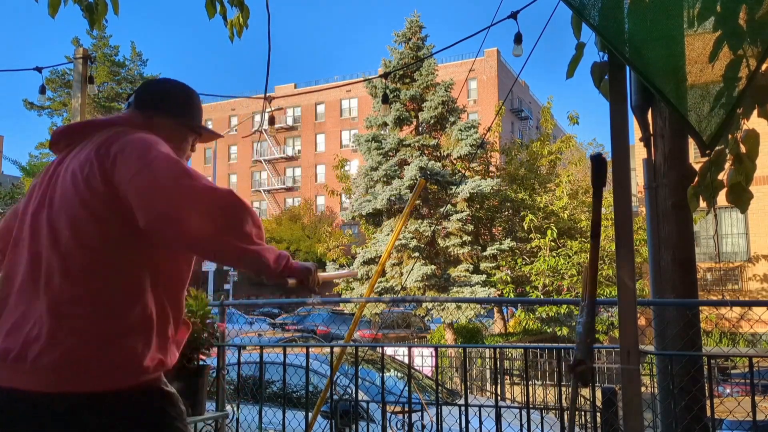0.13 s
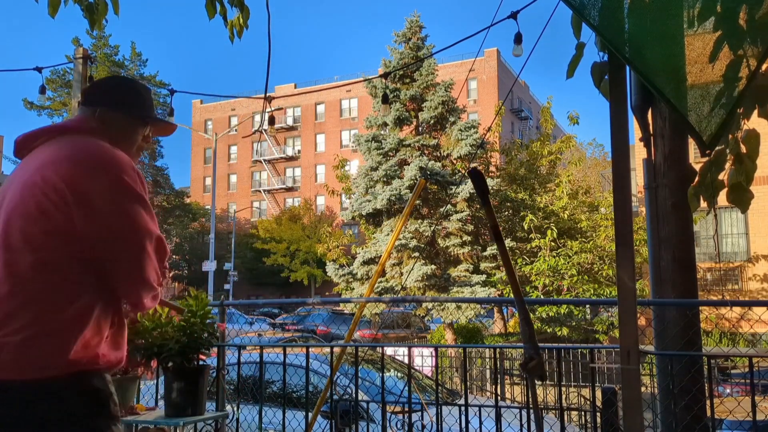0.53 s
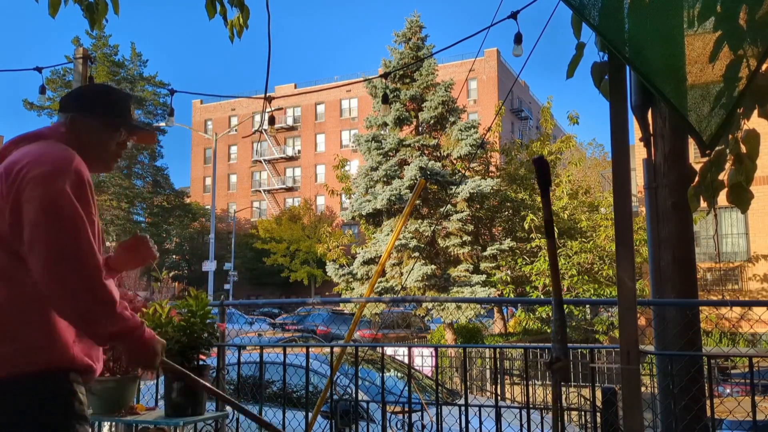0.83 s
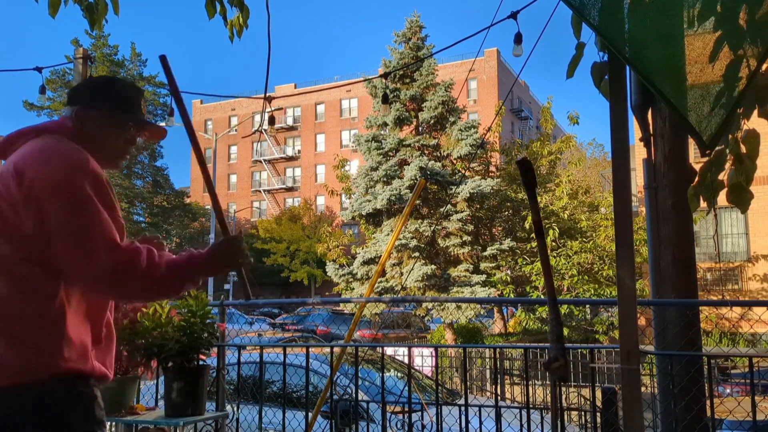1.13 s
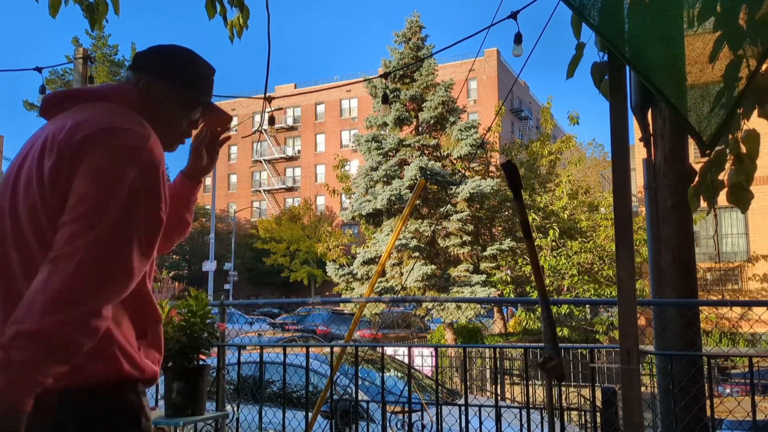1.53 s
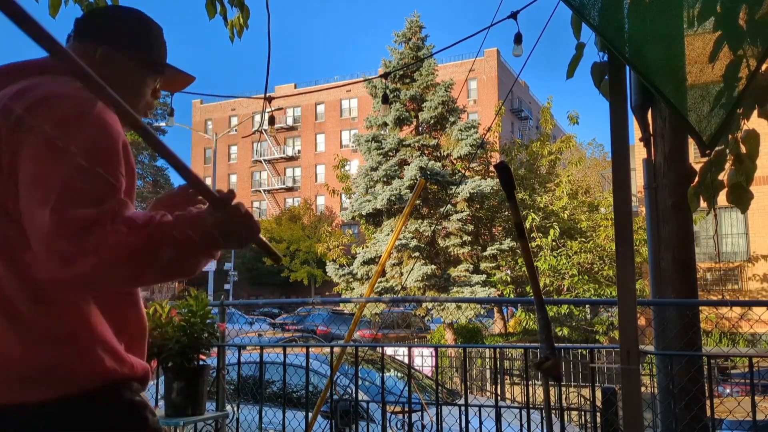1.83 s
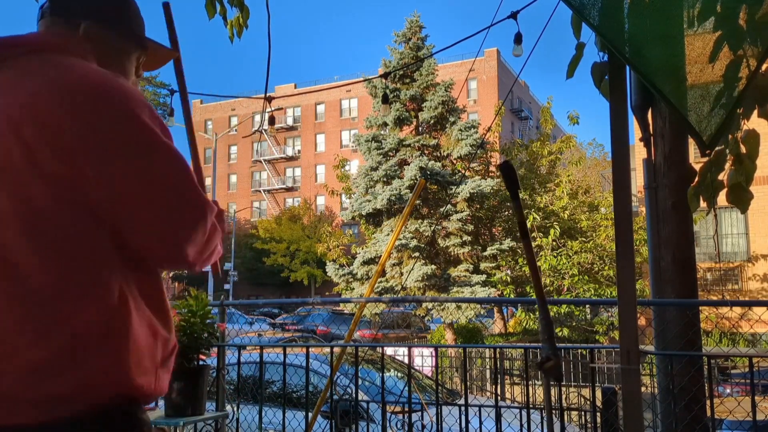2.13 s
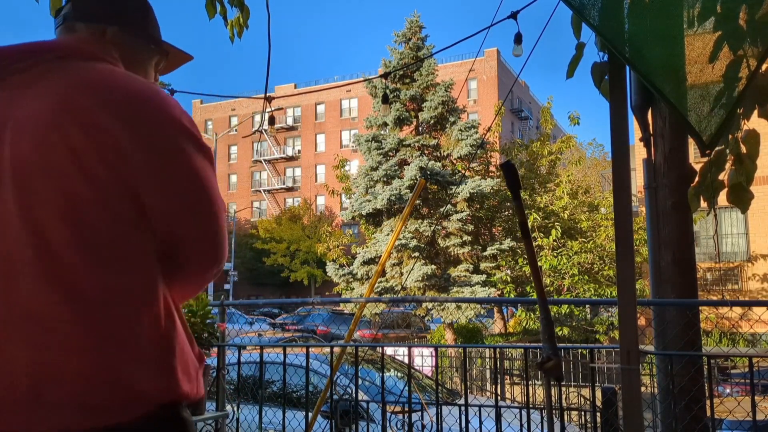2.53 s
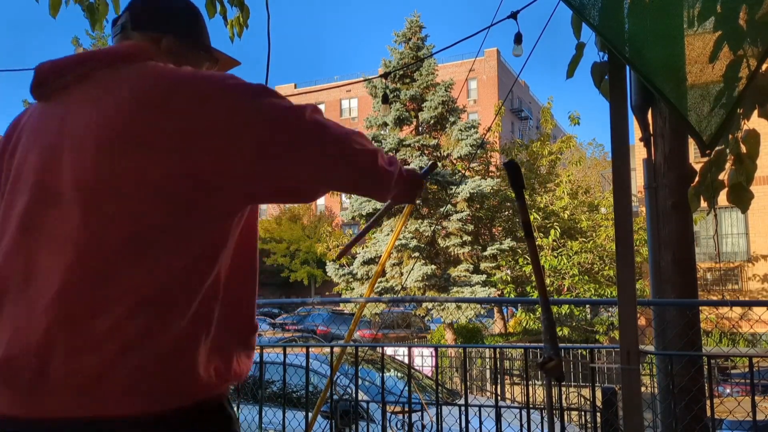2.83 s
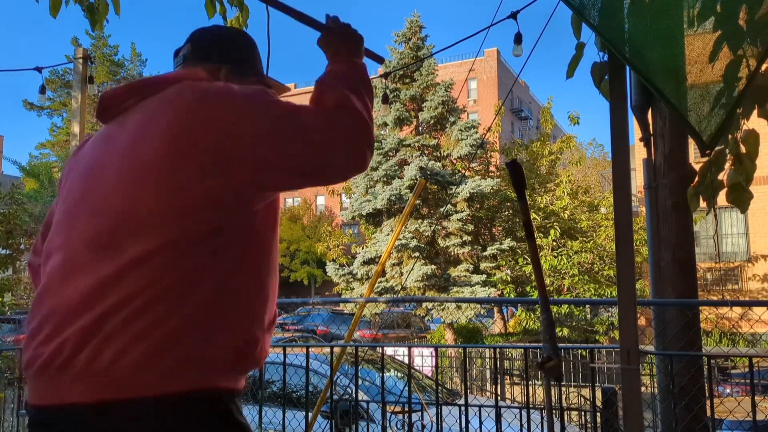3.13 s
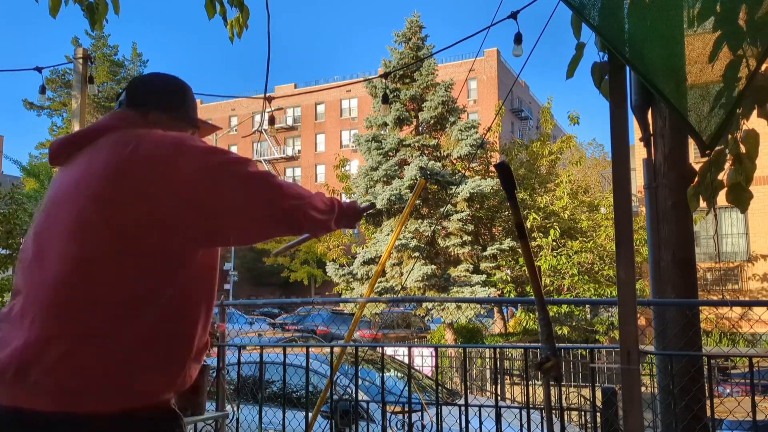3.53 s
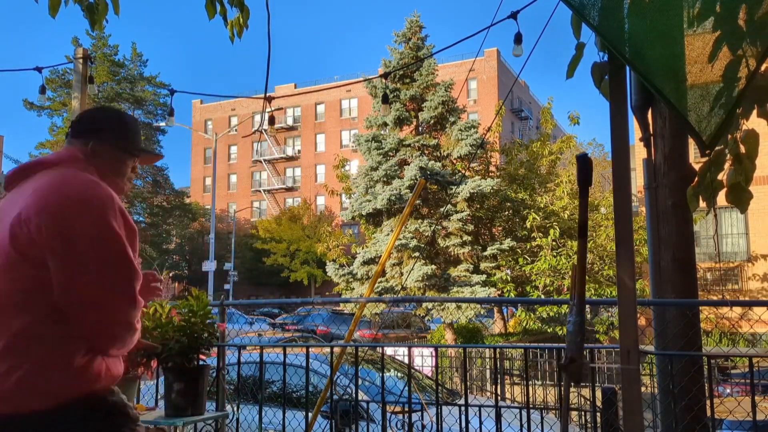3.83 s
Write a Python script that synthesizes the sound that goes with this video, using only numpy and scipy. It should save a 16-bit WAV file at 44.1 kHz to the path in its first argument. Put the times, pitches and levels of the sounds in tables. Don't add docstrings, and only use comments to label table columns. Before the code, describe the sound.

Sharp stick cracks on a hanging wooden baton outdoors, one first, two more after a long gap

```python
import sys
import numpy as np
from scipy import signal
from scipy.io import wavfile

SR = 44100
rng = np.random.default_rng(int(sys.argv[2]) if len(sys.argv) > 2 else 0)


def wav_out(sig):
    wavfile.write(sys.argv[1], SR, np.round(np.clip(np.atleast_2d(sig).T, -1, 1) * 32767).astype(np.int16))


def invert_db(level):
    return 10 ** (np.asarray(level, dtype=float) / 20)


N = 176400


def rms_one(x):
    return x / np.sqrt(np.mean(x ** 2) + 1e-20)


def band(x, lo_hz, hi_hz):
    return signal.sosfilt(signal.butter(2, [lo_hz, hi_hz], "band", fs=SR, output="sos"), x)


def at_hz(points, hz, axis=1):
    points = np.array(points)
    return np.interp(np.log(hz), np.log(points[:, 0]), points[:, axis])


def drift(rate_hz):
    r = np.exp(-80 * np.pi * rate_hz / SR)
    slow = signal.lfilter([1], [1, -2 * r, r * r], rng.standard_normal(N // 40 + 2002))[2000:]
    return np.interp(np.arange(N) / 40, np.arange(len(slow)), rms_one(slow))


def resonate(x, hz, width_hz):
    r = np.exp(-np.pi * width_hz / SR)
    zeros = np.array([1, 0, -1]) * (1 - r * r) / 2
    poles = [1, -2 * r * np.cos(2 * np.pi * hz / SR), r * r]
    return signal.lfilter(zeros, poles, x + 1e-18)


def ring(x, hz, width_hz, count):
    for _ in range(count):
        x = resonate(x, hz, width_hz)
    return x / abs(x).max()


def swell(start_s, length_s, rise_s, fall_s):
    t = np.arange(N) / SR - start_s
    return np.clip(t / rise_s, 0, 1) * np.exp(-np.clip(t - length_s, 0, 1) / fall_s)


def grains():
    spread_db, rate_hz = 3.2, 2000
    size_db = spread_db * np.minimum(rng.exponential(1, (2, N)), 5)
    size = invert_db(size_db) * rng.standard_normal((2, N))
    return size * (rng.random((2, N)) < rate_hz / SR)


# start in seconds, peak in dB, ring of the wood in Hz,
# centre of the colour sent to the walls in Hz, dull body in dB.
BLOWS = [
    (0.0612, -0.5, 1770, 2330, -29),
    (3.2794, -5, 2400, 2400, -18),
    (3.638, -3.5, 2430, 2870, -24.5),
]
# left over right in dB, cheek in dB, tick in dB, share to the walls in dB.
FACING = [(3.5, 3, 6, -3.5), (5.5, 6, 1, -1), (8, 1.8, 2.5, -1.5)]
# delay in seconds, left in dB, right in dB.
ECHOES = [(.083, -15, -19), (.098, -13, -20), (0.1281, -13, -22.5), (0.142, -26, -30), (0.161, -20, -23),
          (.178, -22, -25), (.191, -32, -32)]


def stick():
    bounce_s, bounce_db = 0.0021, -4.5
    out = np.zeros((2, N + 2 * SR))
    click = np.zeros(SR // 20)
    click[0] = 1
    body = ring(click, 508, 230, count=3)
    cheek = invert_db(-18) * ring(click, 1013, 870, count=2)
    tick = invert_db(-16) * np.roll(ring(click, 2 * 3870, 6500, count=2), int(0.0006 * SR))
    for blow, facing in zip(BLOWS, FACING):
        start_s, peak_db, wood_hz, walls_hz, body_db = blow
        pan_db, cheek_db, tick_db, walls_db = facing
        paths = np.zeros((2, SR))
        paths[:, 0] = invert_db([pan_db / 2, -pan_db / 2])
        paths[:, int(bounce_s * SR)] = invert_db(bounce_db)
        for delay_s, *sides_db in ECHOES:
            paths[:, int(delay_s * SR)] = invert_db(np.add(sides_db, walls_db))
        edge = invert_db(tick_db) * tick + invert_db(cheek_db) * cheek
        direct = ring(click, wood_hz, 1470, count=4) + edge + invert_db(body_db + 1.5) * body

        lo_hz, hi_hz = 0.69 * walls_hz, 1.276 * walls_hz
        flat = band(band(click, 0.82 * lo_hz, 1.5 * hi_hz), lo_hz, hi_hz)
        to_walls = invert_db(0.5 + walls_db) * flat / abs(flat).max() + invert_db(-4) * edge + invert_db(body_db) * body

        hit = signal.fftconvolve(direct[None], paths, axes=1)
        hit = hit + signal.fftconvolve(to_walls[None], yard_tail(), axes=1)
        first = int(start_s * SR)
        out[:, first:first + hit.shape[1]] += invert_db(peak_db) * hit
    return out[:, :N]


# frequency in Hz, first T60 in seconds, late T60 in seconds, late part in dB.
YARD = [(414.6, 0.22, 1, -15.5), (1440, 0.14, 1, -11), (2450, 0.12, 0.74, -8.5), (4440, 0.12, 0.73, -10),
        (8250, 0.15, 0.71, -4.5), (13820, 0.1, 0.34, -16)]


def yard_tail():
    level_db, lumps_db, low_alike = -24, 1.5, 0.32
    start_s, rise_s, hold_s, early = 0.008, 0.004, 0.028, invert_db(-8)
    facade_s, facade_spread_s, facade_db = 0.11, 0.029, 6
    t = np.arange(SR) / SR
    late_s = np.maximum(t - hold_s, 0)
    lumps = rng.standard_normal((2, SR // 50)).repeat(50, axis=1)
    white = rng.standard_normal((2, SR)) * invert_db(lumps_db * lumps)
    edges_hz = np.geomspace(200, 17000, num=9)
    tail = 0
    for lo, hi in zip(edges_hz, edges_hz[1:]):
        first_t60, late_t60, late_db = (at_hz(YARD, np.sqrt(lo * hi), axis=k) for k in (1, 2, 3))
        source = white + (hi < 1100) * low_alike * white[::-1]
        decay = invert_db(-60 * late_s / first_t60) + invert_db(late_db - 60 * late_s / late_t60)
        tail = tail + band(np.roll(source, int(lo), axis=1), lo, hi) * decay
    tail = tail * invert_db(facade_db * np.exp(-((t - facade_s) / facade_spread_s) ** 2))
    build = early + (1 - early) * np.clip((t - start_s) / rise_s, 0, 1)
    return invert_db(level_db) * tail * (t > 0.003) * build


# start in seconds, level in dB, die-away in seconds,
# low part in Hz, low part in dB.
KNOCKS = [
    (2.957, -32.5, 0.021, 520, 2.5),
    (3.048, -53, 0.027, 2150, 8),
    (3.083, -29.5, 0.0099, 2030, -14),
    (3.788, -60.5, 0.045, 575, 25.5),
    (3.9604, -48.5, 0.0058, 282, 13.5),
    (3.969, -61.5, 0.014, 290, 25),
    (3.988, -44.5, .015, 1130, 5.5),
]


def knocks():
    rattle = rms_one(grains()) + 1.4 * rng.standard_normal((2, N))
    bright = rms_one(band(rattle, 990, 14150)) + invert_db(-5.5) * rms_one(band(rattle, 1070, 4900))
    out = 0
    for start_s, db, fall_s, low_hz, low_db in KNOCKS:
        wood = invert_db(low_db) * rms_one(ring(rattle + 0.5 * rattle[::-1], low_hz, 0.48 * low_hz, count=2))
        contact = swell(start_s, 0.0024, 0.0008, fall_s)
        soft_tail = invert_db(-21) * swell(start_s, 0.0058, 0.016, 6.9 * fall_s)
        wood_swell = swell(start_s + 0.0027, 0.0025, 0.002, 0.48 * fall_s)
        out = out + invert_db(db) * ((contact + soft_tail) * bright + wood_swell * wood)
    return out


# start in seconds, length in seconds, level in dB, pitch in Hz, second partial in dB.
THRUMS = [(0.074, 0.049, -29.5, 120.1, -3.5), (0.365, 0.064, -42, 120.4, -4.5),
          (0.657, 0.062, -36, 119.2, -15), (0.92, 0.024, -41, 119.3, -2.5),
          (1.185, 0.038, -42, 122.1, -10.5), (1.392, 0.057, -44.5, 120, -11.5),
          (1.583, 0.057, -48.5, 120, -12), (1.75, 0.035, -55, 116.2, -18), (2.981, 0.05, -34, 127, -7),
          (3.077, 0.04, -47, 126.7, -21), (3.217, 0.23, -45, 119.9, -6.5),
          (3.282, 0.0083, -24, 122.1, -6.5), (3.327, 0.056, -32, 126.7, -5.5),
          (3.66, 0.025, -23.5, 119, -13.5), (3.701, 0.032, -30.5, 117, -14)]


def frame():
    rise_s, fall_s, sag, sag_s = 0.012, 0.018, 0.093, 0.015
    skew_rad, upper_db, buzz_db = 0.82, -11, -10
    out = np.zeros((2, N))
    wobble_s = np.cumsum(1 + 0.03 * drift(32.9)) / SR
    lumps = invert_db(2 * drift(48))
    noise = rng.standard_normal((2, N))
    body = invert_db(-8.5) * rms_one(ring(noise[0, ::-1], 175, 145, count=2))
    for start_s, length_s, db, hz, second_db in THRUMS:
        first = int(start_s * SR)
        span = slice(first, min(N, first + SR // 3))
        t = np.arange(span.stop - first) / SR
        phase = 2 * np.pi * hz * (wobble_s[span] - sag * sag_s * np.exp(-t / sag_s))
        kicked = (noise[:, span] + 0.41 * noise[::-1, span]) * (1 + np.cos(phase)) ** 2
        buzz = rms_one(ring(kicked, 500, 1.48 * 350, count=2))
        partials = sum(np.cos(k * phase + k * k) * invert_db(-1.5 * abs(k - 4.5)) for k in range(4, 9))
        upper = invert_db(upper_db + second_db) * partials
        octave = invert_db(second_db) * np.cos(2 * phase + skew_rad)
        tone = np.sqrt(2) * (np.cos(phase) + octave + upper) + invert_db(buzz_db) * buzz + body[span]
        out[:, span] += invert_db(db) * (swell(start_s, length_s, rise_s, fall_s) * lumps)[span] * tone
    return out * invert_db([[1.3], [-1.3]])


# start in seconds, length in seconds, level in dB, middle part in dB.
RUSTLES = [(0.371, 0.057, -58.5, -0.5), (0.447, 0.08, -69.5, 6.5), (0.651, 0.066, -63, -1.5),
           (0.77, 0.0058, -59, -3.5), (0.856, 0.032, -67, -1.5), (0.901, 0.11, -69, 2),
           (1.027, 0.0081, -67, 6.5), (1.113, 0.013, -65, -6), (1.152, 0.039, -66.5, -3),
           (1.326, 0.09, -69, 1), (1.444, 0.021, -74, 9), (1.582, 0.03, -64, 2), (1.655, 0.033, -58, -3.5),
           (1.74, 0.011, -59.5, -7), (1.775, 0.048, -63, -0.5), (1.92, 0.033, -88, -5),
           (2.013, 0.023, -66.5, 4), (2.05, 0.025, -62.5, -2), (2.11, 0.035, -70, 1.5),
           (2.425, 0.011, -72, -2), (2.497, 0.025, -82, -6), (2.736, .03, -73.5, 7),
           (2.778, 0.0072, -69, -4)]
# frequency in Hz, width in Hz, level in dB.
CLIPS = [(4470, 120, -16), (5010, 140, -15), (14600, 500, -15)]
RUSTLE_EDGES_HZ = [2800, 4200, 5600, 7600, 10000, 12000, 13600, 16000]


def rustle():
    g = grains()
    parts = []
    for lo, hi in zip(RUSTLE_EDGES_HZ, RUSTLE_EDGES_HZ[1:]):
        parts.append(band(np.roll(g, int(lo // 7), axis=1), lo, hi) * invert_db(2.2 * drift(14)))
    hook = rms_one(resonate(g, 12600, 140))
    high = rms_one(sum(parts[3:])) + invert_db(-20 + 9.8 * drift(5)) * hook
    middle = rms_one(sum(parts[:3]))
    for hz, width_hz, db in CLIPS:
        middle = middle + invert_db(db + 4 * drift(8)) * rms_one(resonate(g, hz, width_hz))
    out = 0
    for start_s, peak_db, *_ in BLOWS:
        out = out + invert_db(peak_db - 34.5) * swell(start_s + 0.0051, 0.026, 0.002, 0.0074) * hook
    for start_s, length_s, db, middle_db in RUSTLES:
        out = out + invert_db(db) * swell(start_s, length_s, 0.005, 0.022) * (high + invert_db(middle_db + 3) * middle)
    return out


# start in seconds, length in seconds, level in dB, middle
# part in dB.
SHAKES = [(0, 0.065, -66, 7.5), (0.057, 0.023, -33, 9.5), (0.147, 0.05, -40, 5), (0.209, 0.072, -48.5, 4),
          (3.0, 0.05, -67, 13), (3.275, 0.031, -36.5, 10), (3.336, 0.051, -70, 18), (3.446, 0.019, -55, 9),
          (3.572, 0.047, -61, 4), (3.635, 0.01, -30.5, 8.5), (3.723, 0.079, -48.5, 4.5),
          (3.869, 0.14, -73, 9)]


def shakes():
    dense = rms_one(grains()) + 8.4 * rng.standard_normal((2, N))
    high, middle = rms_one(band(dense, 11000, 14100)), rms_one(band(dense, 3460, 5970))
    out = 0
    for start_s, length_s, db, middle_db in SHAKES:
        out = out + invert_db(db) * swell(start_s, length_s, 0.008, 0.033) * (high + invert_db(middle_db - 5) * middle)
    return out


def cloth():
    return (rustle() + shakes()) * invert_db(1.5 + drift(20)) * invert_db([[0.6], [-0.6]])


# start in seconds, length in seconds, level in dB, pitch in Hz.
JINGLES = [(.378, 0.055, -64, 12500), (.46, 0.098, -61, 4500), (0.653, .06, -64, 12800),
           (.66, .06, -67, 5000), (0.77, .01, -62, 12600), (0.856, 0.018, -68, 12700),
           (1.03, .02, -75, 4560), (1.13, .07, -70, 14500), (1.157, .02, -72, 12600),
           (1.335, 0.072, -71, 12800), (1.585, .04, -70, 12700), (1.588, .03, -61, 4900),
           (1.742, .015, -60, 12700), (2.022, .04, -63, 14700), (2.054, .03, -66, 12700),
           (2.11, .04, -70, 14500), (2.777, .015, -64, 14500), (3.012, .045, -56, 4550)]


def jingles():
    out, g = np.zeros((2, N)), grains()
    for start_s, length_s, db, hz in JINGLES:
        first = int(start_s * SR)
        span = slice(first, first + SR // 5)
        metal = rms_one(ring(g[:, span], hz, 0.03 * hz, count=2))
        out[:, span] += invert_db(db) * swell(start_s, length_s, 0.003, 0.01)[span] * metal
    return out


# start in seconds, length in seconds, level in dB, pitch in Hz.
BIRD = [
    (2.17, .05, -68, 3450),
    (2.2, .03, -72, 4000),
    (2.32, .13, -70, 3480),
    (2.49, .06, -72, 3450),
    (2.74, .03, -70, 3400),
]


def bird():
    noise = rng.standard_normal(N)
    out = 0
    for start_s, length_s, db, hz in BIRD:
        out = out + invert_db(db) * swell(start_s, length_s, 0.0035, 0.015) * rms_one(ring(noise, hz, 110, count=2))
    return out


# frequency in Hz, level in dB.
TOWN = [(30, -12), (76, -3), (330, -13.5), (600, -12), (1800, -23), (4000, -40.5), (8200, -55),
        (16000, -53)]
# frequency in Hz, likeness from 0 to 1.
LIKENESS = [(40, 1), (150, 0.93), (350, 0.76), (700, 0.043), (2000, 0.018), (10000, 0.01)]


def town():
    level_db, pan_db, sway_db = -42.5, 1.7, 0.6
    together = drift(1)
    edges_hz = 25 * 2 ** np.arange(0, 9.6, 0.5)
    white = rng.standard_normal((2, 2, N))
    out = 0
    for k, (lo, hi) in enumerate(zip(edges_hz, edges_hz[1:])):
        mid, side = band(white[k % 2], lo, hi)
        centre_hz = np.sqrt(lo * hi)
        alike = at_hz(LIKENESS, centre_hz)
        gain = invert_db(at_hz(TOWN, centre_hz) + sway_db * (together + drift(2.5)))
        out = out + gain * (np.sqrt(1 + alike) * mid + np.sqrt(1 - alike) * side * [[1], [-1]])
    return invert_db(level_db + pan_db * np.array([[0.5], [-0.5]])) * rms_one(out)


def scene():
    return stick() + knocks() + frame() + cloth() + jingles() + bird() + town()


def roll_off(x):
    return signal.sosfilt(signal.butter(12, 16970, fs=SR, output="sos"), x)


def record(dry):
    x = signal.sosfilt(signal.butter(3, 42, "high", fs=SR, output="sos"), dry)
    x = x - 0.52 * resonate(x, 7990, 500)
    x = 1.3 * np.tanh(x / 1.3)
    x = signal.sosfilt(signal.cheby2(8, 30, 15800 * 1.03, fs=SR, output="sos"), x)
    return roll_off(x)


dry = scene()
out = record(dry)
wav_out(out)
```